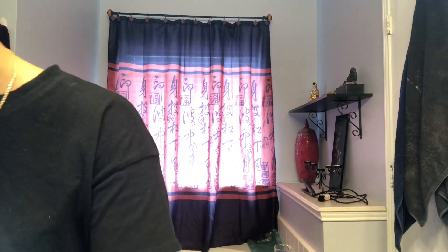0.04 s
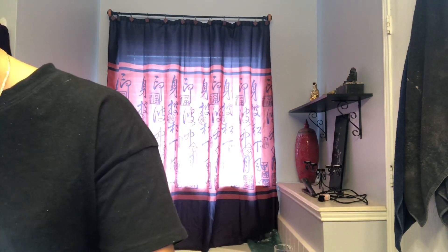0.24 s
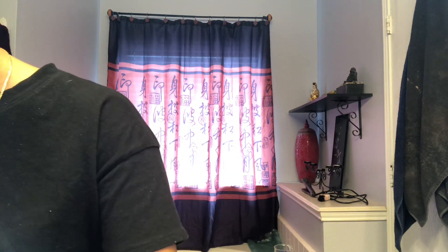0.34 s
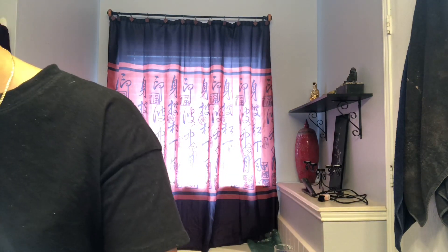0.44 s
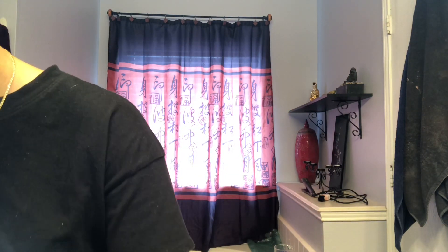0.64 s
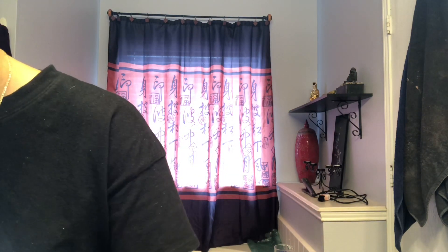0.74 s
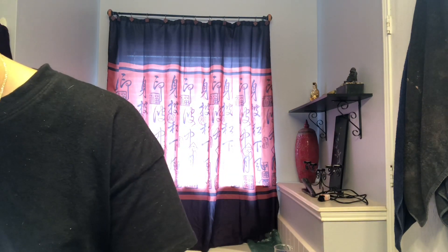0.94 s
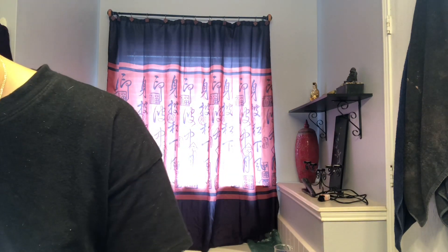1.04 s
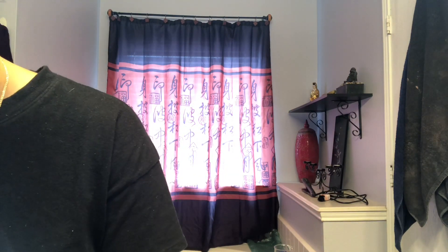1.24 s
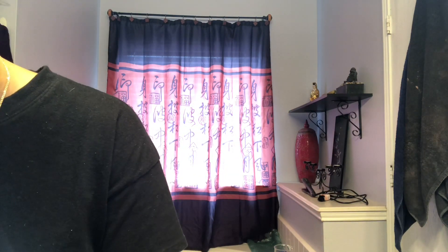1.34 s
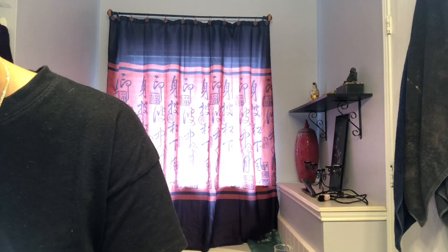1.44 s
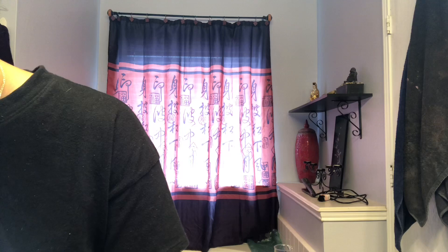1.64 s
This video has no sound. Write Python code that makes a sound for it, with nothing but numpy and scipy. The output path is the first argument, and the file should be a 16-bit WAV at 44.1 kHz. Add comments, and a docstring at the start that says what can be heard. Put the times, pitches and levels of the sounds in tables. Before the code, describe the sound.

Small plastic makeup containers clatter and click as they are handled in an echoing bathroom.

```python
"""Light plastic clicks and dull bumps come first, as small makeup containers jostle in a hard-walled bathroom.
One is then set down on a hollow counter, which booms; another is picked up, scrapes and clicks.
Clicks are filtered noise bursts with clustered case modes; bumps are single damped resonances with rub noise.
Scrapes are dense random impulses, and the boom is a sum of decaying modes.
Convolution with decaying noise and a few standing waves makes the room ring on, over quiet background air."""
import sys
import numpy as np
from scipy import signal
from scipy.fft import rfft, irfft, next_fast_len
from scipy.io import wavfile

SR = 44100
rng = np.random.default_rng(int(sys.argv[2]) if len(sys.argv) > 2 else 0)


def log_audio(samples):
    """Write samples as a 16-bit WAV file to the path given in sys.argv[1]."""
    # one column per channel
    frames = np.atleast_2d(samples).T
    # limit to full scale, then quantise
    limited = np.clip(frames, -1, 1)
    pcm = np.round(limited * 32767).astype(np.int16)
    wavfile.write(sys.argv[1], SR, pcm)


N = 74970
T = np.arange(N) / SR  # time axis/s

# Background air spectrum, relative: f/Hz, level/dB
AIR_SPECTRUM = [(25, -34), (45, -38), (68, 2.5), (110, 0), (250, -4.5), (400, -13), (550, -17.5),
                (1000, -16), (3000, -46), (7000, -32.5), (15500, -45)]
AIR_DB = -61.5  # rms level

# Standing waves between the walls: f/Hz, relative level/dB, t60/s
STANDING_WAVES = [(252.7, -16, 0.41), (360.5, -25, 0.62), (392.8, -19, 0.8), (550.6, -14.5, 1),
                  (560.4, -12, 0.63)]
STANDING_WAVES_DB = -17  # common gain

# Bathroom reverberation: f/Hz, t60/s, level against the direct sound/dB
REVERBERATION = [(69.6, 0.82, -5.5), (139, 0.37, -6), (265, 0.58, -10.5), (510, 0.64, -5.5),
                 (1050, 0.49, -7), (2600, 0.47, -4.5), (5400, 0.41, -8), (7440, 0.36, -5.5),
                 (10800, 0.32, -8), (17200, 0.31, -13.5)]
ROOM_DELAY_MS, ROOM_BUILD_MS = 1, 3.9

# Modes of the hollow counter: f/Hz, relative level/dB, t60/s
COUNTER_MODES = [(58, -8.5, 0.5), (72.8, -5, 0.52), (107.7, -6, 0.48), (163.2, -0.5, 0.22), (217, 3, 0.17),
                 (239.2, -5.5, 0.41), (332, -15, 0.096), (562, -2, 0.22), (573.5, 3, 0.24),
                 (697, -15, 0.43), (910, -12, 0.3), (1091, -7, 0.16), (1110, -20, .18)]
# Contacts with the counter: t/s, level/dB, tilt/(dB per octave)
COUNTER_CONTACTS = [(0.7355, -24, -1), (1.103, -54.5, -9), (1.196, -50.5, -7), (1.345, -42.5, -2)]
COUNTER_PIVOT_HZ, COUNTER_RISE_CYCLES = 207, 0.45
COUNTER_ROOM_DB = -6  # gain of the boom into the reverberation

# Cases sliding on each other: start t/s, length/s, level/dB, tilt/(dB per octave)
SLIDE_EVENTS = [(-0.02, 0.14, -41.5, 1.5), (0.164, 0.064, -41, -0.5), (0.196, 0.057, -43, -1.5),
                (0.234, 0.12, -27, 1), (0.285, 0.099, -28, -0.5), (0.442, 0.063, -48.5, 1),
                (0.567, 0.26, -63.5, 4.5), (1.101, 0.18, -42.5, 2), (1.264, 0.14, -31, 4),
                (1.54, 0.23, -52.5, 0)]
# Sliding spectrum, relative: f/Hz, level/dB
SLIDE_SPECTRUM = [(30, 5), (75, -24.5), (115, 4), (150, -8), (220, 5.5), (500, 4), (1000, -9), (1600, -12),
                  (2500, -16.5), (5500, -23.5), (9000, -36.5), (15500, -45)]
CATCHES_PER_S, CATCH_SPREAD_DB = 2800, 3

# Dull bumps of cases and fingers: t/s, level/dB, pitch f/Hz, decay constant of the driving envelope/ms
KNOCK_EVENTS = [(0.001, -36, 213, 2), (0.032, -34, 222, 2.7), (0.044, -38, 420, 2.9),
                (0.069, -39, 498, 9.9), (0.1698, -41.5, 950, 4.4), (0.183, -36, 307, 2.5),
                (0.2030, -27, 830, 2.3), (0.2510, -28.5, 410, 5.8), (0.259, -30, 227, 7.5),
                (0.2720, -42, 480, 9.9), (0.2860, -53, 710, 2.5), (0.2965, -19, 200, 10.6),
                (0.3087, -20.5, 357, 1.7), (0.3195, -24, 508, 14), (0.3380, -54, 410, 8.5),
                (0.7300, -22.5, 1129, 3.9), (0.7380, -16.5, 291, 5.6), (1.0985, -35, 576, 3.8),
                (1.1010, -35.5, 263, 4.9), (1.1395, -38, 790, 2), (1.1558, -28.5, 568, 3.3),
                (1.1670, -38, 556, 9.1), (1.2100, -54, 450, 4.1), (1.2910, -32, 540, 3.1),
                (1.3060, -28, 446, 4), (1.3440, -22, 313, 3.6), (1.4130, -21.5, 317, 3.9),
                (1.6130, -41.5, 354, 3.6), (1.6390, -41.5, 330, 4), (1.6790, -42.5, 485, 1.7)]
# Knock spectrum about its pitch, relative: f/pitch [ratio], level/dB
KNOCK_SPECTRUM = [(.12, -27), (.35, -7.5), (.7, 4.5), (1.5, -3), (3, -14.5), (6, -34.5), (25, -55)]
KNOCK_RUB_DB, KNOCK_PUSH_MS = -5, 0.31  # rub against body; onset time constant

# Hard contacts: t/s, crack level/dB, crack tilt/(dB per octave),
# decay constant of the crack's driving envelope/ms, case ring f/Hz, ring level/dB
CLICK_EVENTS = [(0.0065, -37.5, -4, 4.5, 3710, -41.5), (0.0445, -43, 2.5, 1.6, 4390, -46.5),
                (0.0694, -46, 2.5, 1, 7160, -37.5), (0.0698, -44, -12, 1.7, 4750, -38),
                (0.1475, -49, -1.5, 4.4, 10800, -60), (0.2455, -40, 0.5, 5.1, 1310, -35),
                (0.2500, -27.5, -3, 8.7, 2480, -39), (0.2577, -38, -1, 4.5, 1450, -47),
                (0.2790, -24, -7.5, 4.9, 7700, -48), (0.2855, -26, -1, 4.9, 4900, -32.5),
                (0.3068, -31, -0.5, 7.5, 5420, -28), (0.3230, -34, 1, 2.8, 2480, -35),
                (0.621, -57, 2, 0.74, 1160, -54.5), (0.6826, -55.5, -5, 1.2, 2870, -66),
                (0.7195, -39, 0, 2.4, 2670, -40), (0.7246, -36, 0, 3.4, 5560, -59),
                (0.729, -18.5, -5, 2.6, 1150, -31), (0.7302, -22.5, -4.5, 4.6, 2300, -31),
                (0.733, -18, 0.5, 2.8, 4790, -25.5), (0.7371, -41, 6, 1.5, 15300, -34.5),
                (0.7380, -25.5, -1.5, 4.5, 5400, -29), (0.997, -50, -4, 0.57, 2660, -58.5),
                (1.0947, -42.5, -1, 6, 1780, -51), (1.104, -40.5, -4.5, 4.7, 1880, -45),
                (1.1540, -31.5, -5.5, 3.5, 5520, -42.5), (1.179, -38, -2.5, 2.5, 3330, -42.5),
                (1.2034, -30.5, -1.5, 7.5, 3550, -33), (1.211, -34, -1.5, 9, 4900, -34.5),
                (1.2541, -32.5, 2.5, 5.4, 3400, -34.5), (1.2646, -29.5, -2.5, 7, 8500, -42),
                (1.2868, -24.5, -2, 4.7, 4870, -26), (1.2897, -30, -4, 0.91, 9180, -31.5),
                (1.3036, -25, 0, 7.5, 2800, -56), (1.313, -25.5, 0.5, 4.3, 4600, -53),
                (1.317, -23.5, 1.5, 2.9, 2890, -30), (1.3305, -33, 5, 5.2, 14700, -48),
                (1.3369, -32, 3.5, 1.5, 4260, -26.5), (1.3404, -17.5, 10.5, 2.7, 7490, -19.5),
                (1.3856, -25, 2, 1.14, 5680, -22), (1.389, -30.5, 3, 1.25, 2780, -29.5),
                (1.3920, -36, -3.5, 5.5, 4450, -28.5), (1.516, -48, 8, 3.9, 3510, -45.5),
                (1.5575, -40, 4.5, 1.5, 3990, -40), (1.56, -58, 10, 2.8, 1710, -45),
                (1.571, -45, 2, 2.6, 8000, -45), (1.6758, -45, 0, 1.6, 3830, -47.5)]
# Crack spectrum, relative: f/Hz, level/dB
CRACK_SPECTRUM = [(50, -14), (200, -6), (500, 11), (1100, 11), (1700, 7), (2500, 10.5), (3400, 6),
                  (5000, 8), (7500, 6.5), (10500, -6.5), (14000, -10), (16000, -32)]
# Cluster of close case modes: f/ring pitch [ratio], amplitude share [ratio]
CASE_CLUSTER = [(0.842, 0.53), (.91, 0.52), (0.962, 0.76), (0.999, 1), (1.046, 1), (1.102, 0.22),
                (1.188, 0.12)]
CRACK_RISE_MS, CASE_DECAY_MS = 1.0, 2.23

LOW_CUT_HZ, TOP_HZ = 62, 15900  # recorder passband


def amp(db):
    """Level to amplitude: twenty decibels are a factor of ten."""
    return 10 ** (np.asarray(db) / 20)


def along(hz, points, column=1):
    """Linear interpolation of a table column on a logarithmic frequency axis."""
    table = np.array(points, float)
    return np.interp(np.log(np.maximum(hz, 1)), np.log(table[:, 0]), table[:, column])


def colour(x, points, tilt_db=0):
    """Minimum-phase filtering: folding the cepstrum makes a magnitude spectrum causal; tilt pivots at 1 kHz."""
    n = next_fast_len(2 * len(x), True)
    n += n % 2
    hz = np.maximum(np.arange(n // 2 + 1) * SR / n, points[0][0])
    level_db = along(hz, points) + tilt_db * np.log2(hz / 1000)
    cepstrum = irfft(np.log(amp(level_db)))
    cepstrum[1:n // 2] *= 2
    cepstrum[n // 2 + 1:] = 0
    response = np.exp(rfft(cepstrum))
    return irfft(rfft(x, n) * response)[:len(x)]


def blow(x):
    """Energy normalisation: a short sound gets the energy of unit rms level held for 5 ms."""
    return x / np.sqrt(np.sum(x ** 2) / (.005 * SR) + 1e-18)


def fade(t, ms):
    """Exponential decay with a time constant in milliseconds."""
    return np.exp(-t * 1000 / max(ms, .05))


def decay_60(t60):
    """Reverberation time: the amplitude falls by 60 dB in t60 seconds."""
    return np.exp(-np.log(1000) * T / t60)


def mode(hz, t60):
    """Free vibration of one damped mode: a decaying sine."""
    return np.sin(2 * np.pi * hz * T) * decay_60(t60)


def burst(shape, count=4):
    """Whitened transient noise: a flat spectrum under an envelope, so that no pitch stands out."""
    x = rng.standard_normal(len(shape)) * shape
    for _ in range(count):
        spectrum = rfft(x)
        flat = irfft(spectrum / (np.abs(spectrum) + 1e-12), len(x))
        x = flat * np.sqrt(shape)
    return x


def add(out, s, x):
    """Linear superposition of a sound starting at s seconds."""
    i = int(np.clip(s * SR, 0, N - 1))
    out[i:i + len(x)] += x[:N - i]


def air():
    """Stationary broadband noise: the quiet background of the house."""
    x = colour(rng.standard_normal(N), AIR_SPECTRUM)
    return amp(AIR_DB) * x / x.std()


def standing_waves():
    """Modal response of the room: a few low modes outlast the reflections."""
    out = np.zeros(N)
    for hz, db, t60 in STANDING_WAVES:
        wave = mode(hz, t60)
        out += amp(db) * wave / np.linalg.norm(wave)
    return out * amp(STANDING_WAVES_DB)


def bathroom(count=19):
    """Diffuse reverberation: dense reflections off hard walls, each half octave with its own decay."""
    noise = rfft(rng.standard_normal(N))
    hz = np.arange(N // 2 + 1) * SR / N
    build = 1 - fade(np.maximum(T - ROOM_DELAY_MS / 1000, 0), ROOM_BUILD_MS)
    out = np.zeros(N)
    for centre in 40 * 2 ** (np.arange(count) / 2):
        half_octaves = 2 * np.log2(np.maximum(hz, 1) / centre)
        band = np.cos(np.pi / 2 * np.clip(half_octaves, -1, 1)) ** 2
        tail = irfft(noise * band, N) * build * decay_60(along(centre, REVERBERATION))
        # equal energy to the direct sound in this band, before the table's level
        balance = np.sqrt(np.mean(band ** 2) / np.sum(tail ** 2))
        out += tail * balance * amp(along(centre, REVERBERATION, column=2))
    return out


def counter():
    """Modal excitation of a hollow counter by contact: the lowest modes swell last."""
    out = np.zeros(N)
    for hz, db, t60 in COUNTER_MODES:
        swell = 1 - np.exp(-(T * hz / COUNTER_RISE_CYCLES) ** 2)
        ring = mode(hz, t60) * swell
        for s, hit_db, tilt_db in COUNTER_CONTACTS:
            level_db = hit_db + db + tilt_db * np.log2(hz / COUNTER_PIVOT_HZ)
            add(out, s, amp(level_db) * ring)
    return out


def slides():
    """Friction as random impulses: dense little catches swell and die away as the cases slide."""
    out = np.zeros(N)
    for s, length, db, tilt_db in SLIDE_EVENTS:
        happens = rng.random(N) < CATCHES_PER_S / SR
        sign = rng.choice([-1, 1], N)
        strength = amp(CATCH_SPREAD_DB * np.minimum(rng.exponential(size=N), 4))
        swell = np.sin(np.pi * np.clip((T - s) / length, 0, 1))
        x = colour(happens * sign * strength * swell, SLIDE_SPECTRUM, tilt_db)
        out += amp(db) * x / np.sqrt(np.sum(x ** 2) / (length * SR) + 1e-18)
    return out


def knocks(size=4096):
    """Soft impact: one damped body resonance with a little rough contact noise around it."""
    out, t = np.zeros(N), T[:size]
    for s, db, hz, ms in KNOCK_EVENTS:
        shape = fade(t, ms) * (1 - fade(t, KNOCK_PUSH_MS))
        band = [(ratio * hz, band_db) for ratio, band_db in KNOCK_SPECTRUM]
        rub = colour(burst(shape), band)
        body = colour(shape * np.sin(2 * np.pi * hz * t), band)
        add(out, s, amp(db) * (blow(body) + amp(KNOCK_RUB_DB) * blow(rub)))
    return out


def clicks(size=3072, count=5):
    """Hard impact of plastic: a crack and a brief ring of close case modes, sent in several directions."""
    out, t = np.zeros((count, N)), T[:size]
    press = 1 - fade(t, CRACK_RISE_MS)
    for k, (s, db, tilt_db, ms, hz, ring_db) in enumerate(CLICK_EVENTS):
        crack = colour(burst(fade(t, ms) * press), CRACK_SPECTRUM, tilt_db)
        ring = np.zeros(size)
        for ratio, share in CASE_CLUSTER:
            # random starting phase
            ring += share * np.sin(2 * np.pi * (hz * ratio * t + rng.random()))
        ring *= fade(t, CASE_DECAY_MS) * press
        add(out[k % count], s, amp(db) * blow(crack) + amp(ring_db) * blow(ring))
    return out


def convolve(x, response):
    """Response of a linear system: convolution with its impulse response."""
    return signal.fftconvolve(x, response)[:N]


def scene():
    """Superposition of direct and reflected sound: each direction meets its own reflections."""
    boom = counter()
    paths = [*clicks(), knocks() + slides()]
    handling = sum(paths)
    wet = sum(convolve(x, bathroom()) for x in paths)
    wet = wet + convolve(handling, standing_waves())
    wet = wet + amp(COUNTER_ROOM_DB) * convolve(boom, bathroom())
    return (handling + boom + wet + air())[None]


def record(dry):
    """Band limitation: the recorder thins the deepest bass and cuts the top."""
    low_cut = signal.butter(2, LOW_CUT_HZ, "high", fs=SR, output="sos")
    top_cut = signal.ellip(10, .2, 70, TOP_HZ, fs=SR, output="sos")  # ripple/dB, stopband/dB
    return signal.sosfilt(top_cut, signal.sosfilt(low_cut, dry))


dry = scene()
out = record(dry)
log_audio(out)
```